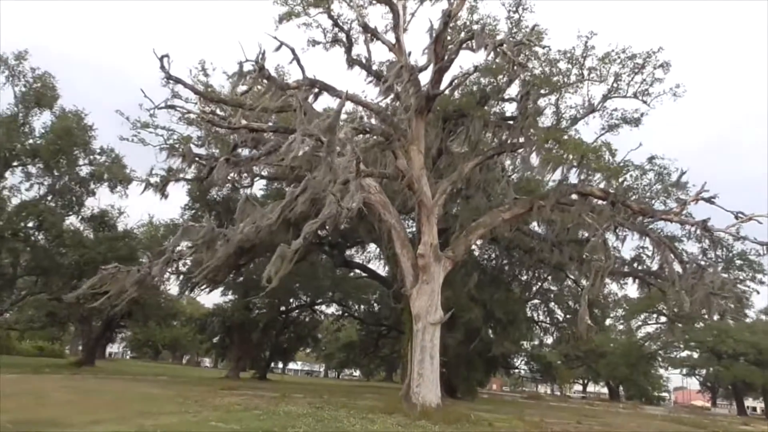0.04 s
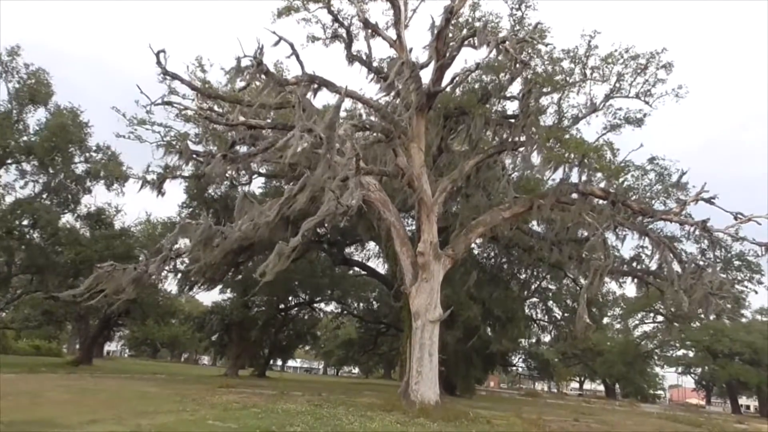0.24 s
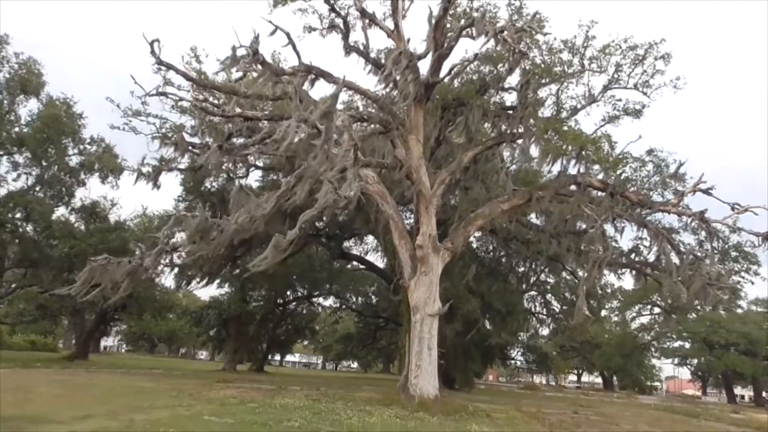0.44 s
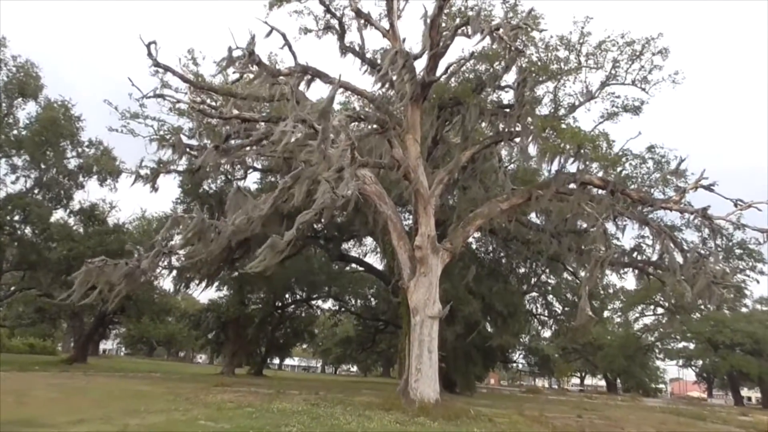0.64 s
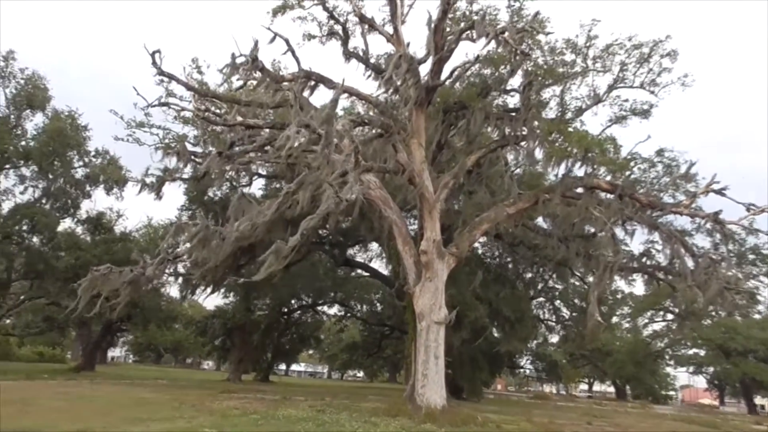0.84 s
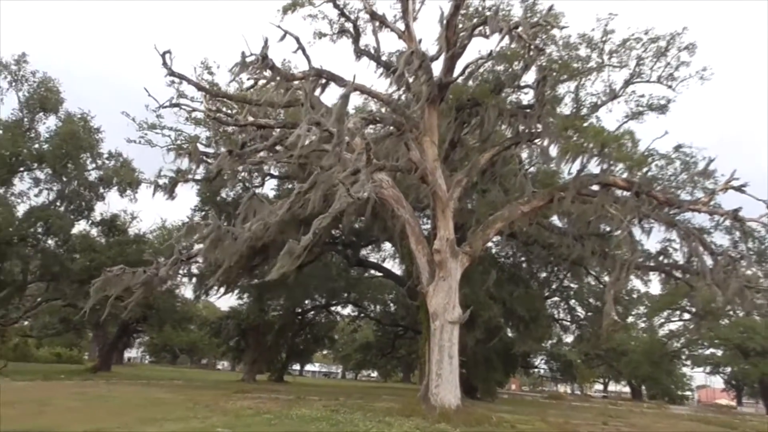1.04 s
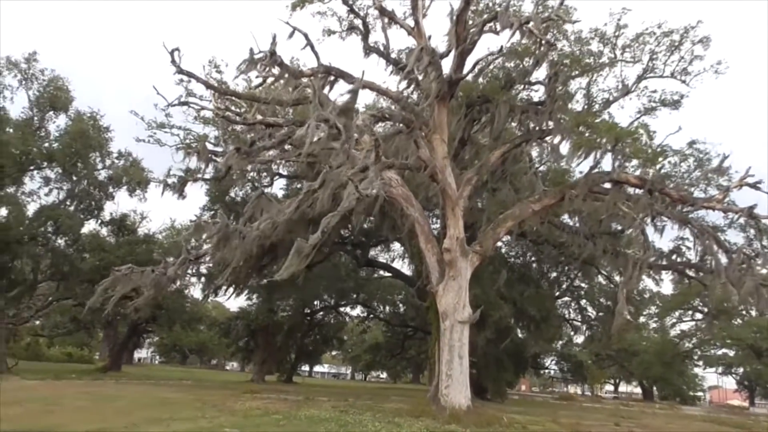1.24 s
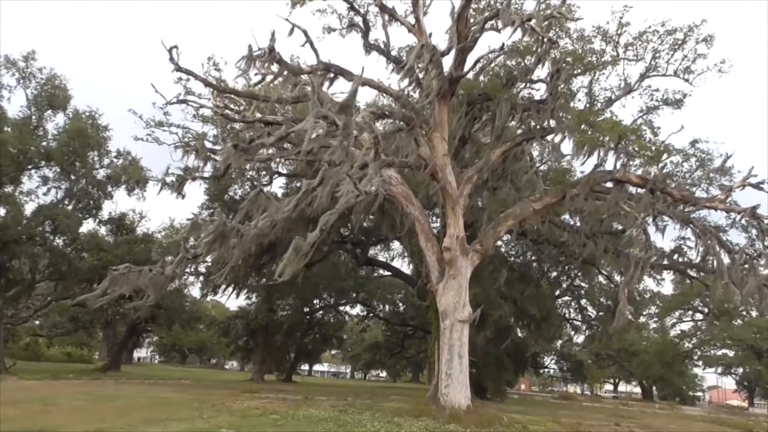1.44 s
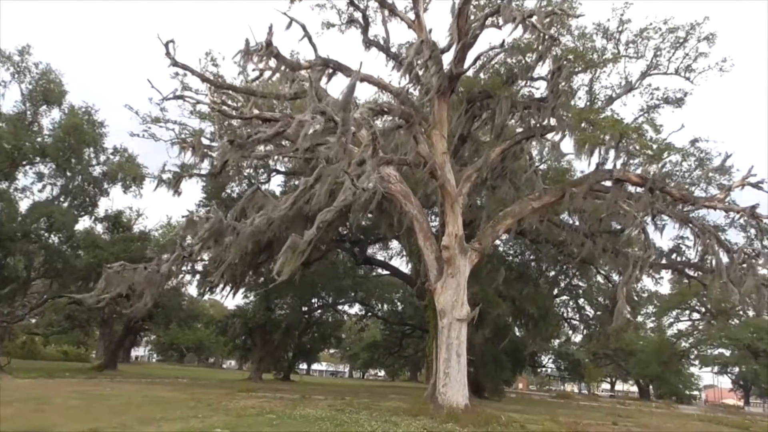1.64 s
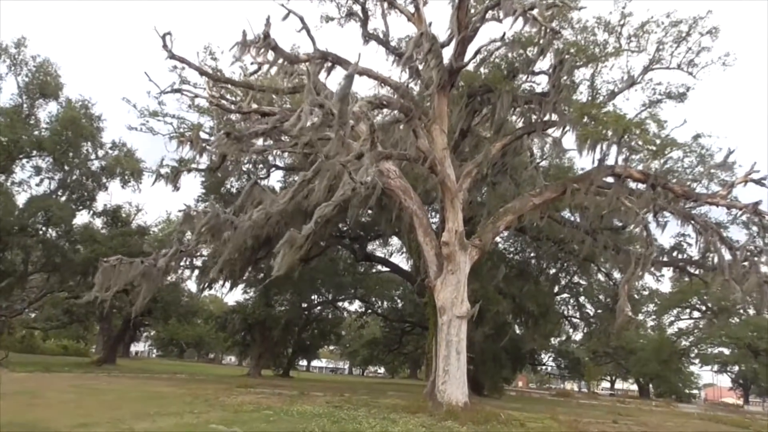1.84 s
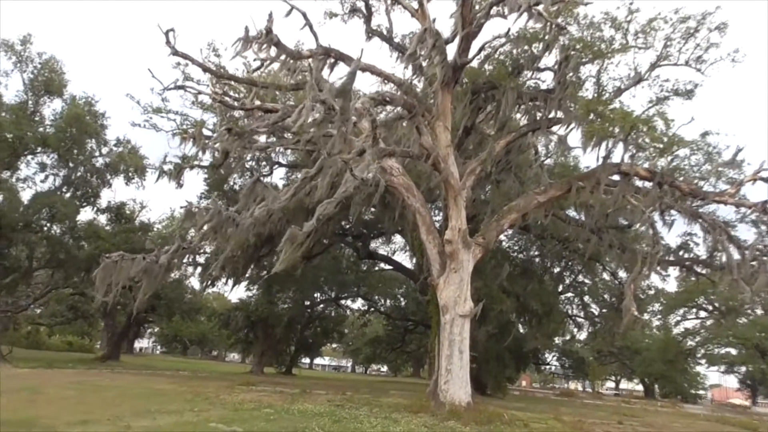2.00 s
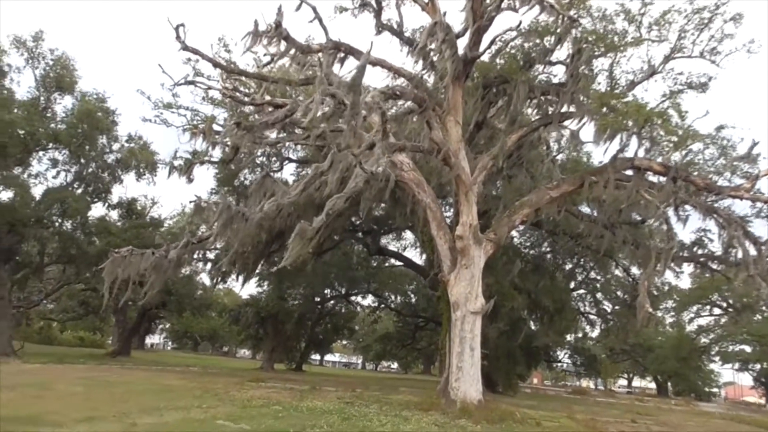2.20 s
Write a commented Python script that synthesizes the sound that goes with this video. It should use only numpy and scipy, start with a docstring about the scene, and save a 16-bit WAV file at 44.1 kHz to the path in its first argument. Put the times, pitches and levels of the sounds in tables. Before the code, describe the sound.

Wind buffets a hand-held microphone on a lawn: weak low rumble first, a heavy thumping gust around 0.5 s, another swell near 0.8 s, a lull about 1.1 s, then strong thuds at 1.4, 1.55 with a small pop, and 1.95 s. A wavering low tone swells near 1.85 s. Faint leaf hiss and distant wash continue; soft grass steps brush at 0.15, 0.75, 1.3 and 1.9 s, the last three with tiny snaps.

```python
"""A hand-held microphone is carried slowly across a lawn, gusts buffeting its two ports from the outset.
Eddy noise makes deep thuds and a lumpy rumble with flutter on top; far off lie a wash and a hiss of leaves.
Four soft steps of grainy grass noise pass close by, three of them with snapping stalks.
From about 0.5 s smooth pulses thump on the ports; past 1.5 s a filtered click pops.
A wavering tone swells around 1.85 s; by then the image has closed nearly to mono."""
import sys
import numpy as np
from scipy import signal
from scipy.fft import rfft, irfft
from scipy.io import wavfile
from scipy.ndimage import uniform_filter1d

SR = 44100
rng = np.random.default_rng(int(sys.argv[2]) if len(sys.argv) > 2 else 0)


def wav_record(signal):
    """Record a signal, one row per channel, as 16-bit PCM in the file named by sys.argv[1]."""
    frames = np.transpose(np.atleast_2d(signal))
    bounded = np.clip(frames, -1, 1)
    # unit amplitude maps onto the largest positive 16-bit level
    quanta = np.round(bounded * 32767).astype(np.int16)
    wavfile.write(sys.argv[1], SR, quanta)


N = 99886
TIME = np.arange(N) / SR


def from_db(db):
    """Decibels to gain."""
    return 10 ** (np.asarray(db) / 20)


def rms_one(x):
    """Scale to unit power."""
    return x / np.sqrt(np.mean(x ** 2))


def in_time(rows):
    """Join the (time, value) rows of a curve with straight lines."""
    seconds, values = np.transpose(rows)
    return np.interp(TIME, seconds, values)


def drift(rate_hz):
    """Slow chance with spread 1: white noise through a two-pole low-pass."""
    step = 40   # samples between the slow values
    pole = np.exp(-2 * np.pi * rate_hz * step / SR)
    white = rng.standard_normal(N // step + 2002)
    slow = signal.lfilter([1], [1, -2 * pole, pole ** 2], white)[2000:]   # drop the filter's start
    return np.interp(np.arange(N) / step, np.arange(len(slow)), rms_one(slow))


def octaves():
    """The place of each spectral line on an octave scale."""
    return np.log2(np.fft.rfftfreq(N, 1 / SR) + 1)


def coloured(spectrum):
    """Two unrelated noises with the given spectrum, falling 30 dB per octave beyond its ends."""
    hz, db = np.transpose(spectrum)
    octave, points = octaves(), np.log2(hz)
    beyond = np.abs(octave - np.clip(octave, points[0], points[-1]))
    gain = from_db(np.interp(octave, points, db) - 30 * beyond)
    white = rng.standard_normal((2, N))
    return rms_one(irfft(rfft(white) * gain, N))


def stereo(pair, likeness):
    """Mix two unrelated signals into left and right with the given correlation."""
    shared = np.sqrt(1 + likeness) * pair[0]
    opposed = np.sqrt(1 - likeness) * pair[1]
    return np.array([shared + opposed, shared - opposed]) / np.sqrt(2)


def swell(s, rise_s, fall_s):
    """An envelope that rises exponentially to 1 at s and dies away exponentially."""
    return np.exp(-np.maximum((s - TIME) / rise_s, (TIME - s) / fall_s))


EDDY_S, EDDY_EVENNESS = 0.0304, 0.74   # length of an eddy [s]; share of chance swings smoothed away


def eddies(spectrum):
    """Turbulent noise at each port, its chance swings partly evened out by the steady flow."""
    noise = coloured(spectrum)
    power = uniform_filter1d(noise ** 2, int(EDDY_S * SR), axis=1) + 1e-9
    return rms_one(noise / power ** (EDDY_EVENNESS / 2))


# deep thudding of the largest eddies: (frequency [Hz], relative density [dB per Hz])
DEEP_SPECTRUM = [(22, -34), (32, -31), (48, -14.5), (70, -8.5), (100, 1.5), (125, 3.5)]
# level of that deep bass at the microphone: (time [s], level [dB])
DEEP_LEVEL = [(0.0, -38), (0.23, -33.5), (0.29, -47), (0.31, -31.5), (0.52, -25), (0.55, -32.5),
              (0.8, -30.5), (0.84, -20.5), (0.9, -32.5), (1.0, -26), (1.03, -35.5), (1.33, -23.5),
              (1.35, -37), (1.38, -20.5), (1.68, -33), (1.72, -34), (1.888, -33), (1.93, -16),
              (1.99, -30.5), (2.26, -24.5)]


def buffeting():
    """Eddies press on each port as deep thuds."""
    return eddies(DEEP_SPECTRUM) * from_db(in_time(DEEP_LEVEL))


# low buffeting close on the ports: (frequency [Hz], relative density [dB per Hz])
RUMBLE_SPECTRUM = [(120, -6), (145, -3), (180, 2.5), (220, -0.5), (300, -5.5), (350, -10), (430, -14),
                   (560, -23.5)]
# wind pressure on the ports, before the rumble's trim: (time [s], level [dB])
GUST_LEVEL = [(0.0, -32.5), (0.11, -43), (0.14, -28.5), (0.29, -45.5), (0.33, -31), (0.37, -36),
              (0.45, -16.5), (0.51, -16), (0.58, -23), (0.64, -24.5), (0.7, -28.5), (0.82, -18.5),
              (0.91, -24.5), (1.01, -22), (1.08, -34), (1.18, -38.5), (1.21, -21), (1.23, -36.5),
              (1.3, -28), (1.4, -26), (1.43, -27.5), (1.51, -20.5), (1.52, -28.5), (1.55, -16.5),
              (1.67, -28.5), (1.7, -18), (1.84, -22), (1.93, -15.5), (1.97, -22), (2.05, -19.5),
              (2.085, -26), (2.13, -21), (2.16, -27.5), (2.2, -23.5), (2.26, -21)]
RUMBLE_TRIM_DB, PATCHY_DB = -0.5, 1.5   # trim; spread of the chance swings in level


def rumble(lumps):
    """Smaller eddies make a rumble whose level is lumpy by chance."""
    return eddies(RUMBLE_SPECTRUM) * from_db(RUMBLE_TRIM_DB + in_time(GUST_LEVEL) + PATCHY_DB * lumps)


# fine turbulence right at the ports: (frequency [Hz], relative density [dB per Hz])
FLUTTER_SPECTRUM = [(330, -2), (480, -0.5), (750, -5.5), (1000, -9.5), (1350, -13.5), (1700, -29),
                    (2300, -33), (3200, -59)]
# level of the fine turbulence, before its trim: (time [s], level [dB])
FLUTTER_LEVEL = [(0, -54), (0.382, -48.5), (.46, -40.5), (.52, -33.5), (.56, -44), (0.682, -43.5),
                 (.8, -35.5), (0.902, -37.5), (1.122, -57), (1.21, -43.5), (1.26, -51.5), (1.38, -43.5),
                 (1.49, -43), (1.55, -30.5), (1.58, -37), (1.66, -40), (1.84, -33.5), (1.93, -31.5),
                 (2.03, -37.5), (2.18, -44), (2.239, -35.5)]
FLUTTER_TRIM_DB, FLUTTER_ROUGH_DB = 0.5, 2.37   # trim; spread of the chance swings
FLUTTER_LIKENESS = .4   # correlation at the two ports


def flutter(lumps):
    """Fine turbulence is rough: it shares the rumble's lumps and adds quicker ones."""
    roughness = (lumps + drift(110)) / np.sqrt(2)
    level_db = FLUTTER_TRIM_DB + in_time(FLUTTER_LEVEL) + FLUTTER_ROUGH_DB * roughness
    return stereo(coloured(FLUTTER_SPECTRUM) * from_db(level_db), FLUTTER_LIKENESS)


# how alike the two ports of the microphone feel the eddies: (time [s], correlation [-1 to 1])
PORT_LIKENESS = [(0, -0.46), (.25, -0.68), (.42, 0.05), (.7, 0.39), (1.0, 0.47), (1.4, 0.028), (1.55, 0.45)]
# left-right lean of the wind noise, jittering by chance, mostly to the right:
# (time [s], left minus right level [dB])
WIND_LEAN = [(0.0, -1.5), (0.46, -3.5), (0.564, -12), (0.6, 1.5), (0.644, -16.5), (0.698, -1.5),
             (0.752, -11.5), (1.122, -11), (1.182, -2.5), (1.248, -14.5), (1.47, -4.5), (1.62, -8.5)]


def wind():
    """Wind noise on both ports leans left or right while its mid level follows the layers' own levels."""
    lumps = drift(59)
    likeness, lean_db = in_time(PORT_LIKENESS), in_time(WIND_LEAN)
    left, right = from_db(lean_db / 2), from_db(-lean_db / 2)
    # level of the average of two partly alike ports; left * right is 1
    centre = np.sqrt(left ** 2 + right ** 2 + 2 * likeness) / 2
    low = stereo(buffeting() + rumble(lumps), likeness) + thumps() + sinking_tone()
    high = flutter(lumps) * 2 / (left + right)
    return (low / centre + high) * np.array([left, right])


# distant sound arrives from all round: (frequency [Hz], left-right correlation [-1 to 1])
DIFFUSE_LIKENESS = [(300, 0.75), (1300, 0.81), (4000, 0.48), (6500, 0.34), (9000, -0.28), (12000, 0.31),
                    (15000, .1)]
# treble balance of the two ports: (frequency [Hz], left minus right level [dB])
PORT_BALANCE = [(5000, -1), (9000, 1), (12000, -3)]


def diffuse(spectrum):
    """Noise from all round: largely alike at both ports in the bass, much less so in the treble."""
    octave = octaves()
    hz, likeness = np.transpose(DIFFUSE_LIKENESS)
    likeness = np.interp(octave, np.log2(hz), likeness)
    hz, balance_db = np.transpose(PORT_BALANCE)
    balance_db = np.interp(octave, np.log2(hz), balance_db)
    ports = stereo(rfft(coloured(spectrum)), likeness)
    return irfft(ports * from_db([balance_db / 2, -balance_db / 2]), N)


# distant outdoor wash: (frequency [Hz], relative density [dB per Hz])
WASH_SPECTRUM = [(300, 0.5), (500, 7), (800, 3), (1300, -1.5), (1700, -10), (2100, -14.5), (2700, -32)]
# hiss of leaves: (frequency [Hz], relative density [dB per Hz])
LEAVES_SPECTRUM = [(2000, 1), (4600, -0.5), (6100, -5), (7400, 0), (9300, -1), (12000, -6), (14000, -12.5),
                   (15600, -16)]
# level of that hiss at the microphone: (time [s], level [dB])
LEAVES_LEVEL = [(0, -53.5), (.25, -56), (.5, -55), (.61, -60), (.75, -57), (1.45, -54.5), (1.58, -61),
                (1.9, -58.5), (2.26, -57.5)]
WASH_DB, WASH_FOLLOWS = -43.5, 0.68   # mean level; share of the hiss's swing in dB that it follows


def surroundings():
    """A far wash and the hiss of the trees, rising and sinking together."""
    leaves_db = in_time(LEAVES_LEVEL)
    wash_db = WASH_DB + WASH_FOLLOWS * (leaves_db - leaves_db.mean())
    wash = from_db(wash_db) * diffuse(WASH_SPECTRUM)
    leaves = from_db(leaves_db) * diffuse(LEAVES_SPECTRUM)
    return wash + leaves


# dry stalks snap underfoot: (time [s], envelope peak [dB], lowest frequency [Hz])
SNAPS = [(.743, -47, 7000), (.747, -44.5, 4000), (.7585, -44.5, 7500), (1.2738, -43, 5000),
         (1.2767, -36.5, 8200), (1.285, -49, 8000), (1.4097, -43, 5000), (1.897, -53, 3500)]
SNAP_RISE_S, SNAP_FALL_S, SNAP_TOP_HZ = 0.00033, 0.001, 11400


def snaps():
    """A stalk breaks with a very short puff of noise in one band, alike at both ports."""
    total = np.zeros(N)
    for s, db, low_hz in SNAPS:
        puff = coloured([(low_hz, 0), (SNAP_TOP_HZ, 0)])[0]
        total += from_db(db) * puff * swell(s, SNAP_RISE_S, SNAP_FALL_S)
    return total


# shoes brush through the grass, up to three times a step:
# (time [s], envelope peak [dB], rise and fade time [s])
BRUSHES = [(.148, -53.5, 0.053), (.76, -54.5, 0.07), (1.27, -54, 0.064), (1.358, -49.5, 0.036),
           (1.415, -52, 0.068), (1.88, -55, 0.065), (1.995, -58, 0.07)]
# swish of the blades: (frequency [Hz], relative density [dB per Hz])
GRASS_SPECTRUM = [(2500, -12), (4500, -1), (6300, -0.5), (7300, 1.5), (9200, 6), (10300, 0), (12500, 0),
                  (15500, -14)]
GRAIN_RATE_HZ, GRAIN_DB, STEP_LIKENESS = 180, 2.5, 0.35   # grain speed, spread; port correlation
SPLINTER_DB, SPLINTER_S = -14, 0.0099   # crackle after a snap: level against the snap, fade time


def footsteps():
    """Each step is a grainy swish of grass; stalks snap and their fibres crackle on briefly."""
    brushing = np.sqrt(sum((from_db(db) * swell(s, fade_s, fade_s)) ** 2 for s, db, fade_s in BRUSHES))
    splintering = sum(from_db(db + SPLINTER_DB) * swell(s, SNAP_FALL_S, SPLINTER_S) for s, db, _ in SNAPS)
    grains = from_db(GRAIN_DB * drift(GRAIN_RATE_HZ))
    swish = stereo(coloured(GRASS_SPECTRUM), STEP_LIKENESS)
    return swish * np.hypot(brushing, splintering) * grains + snaps()


# single large eddies thump on the ports, before the left-right lean: (time [s], peak level [dB])
THUMPS = [(0.4629, -11.5), (1.401, -14), (1.546, -11), (1.9447, -12)]
THUMP_HZ = 187   # strongest frequency of the pulse


def thumps():
    """A large eddy passes as one smooth push with a slight suction before and after it."""
    total = np.zeros(N)
    for s, db in THUMPS:
        u = (np.pi * THUMP_HZ * (TIME - s)) ** 2
        total += from_db(db) * (1 - 2 * u) * np.exp(-u)
    return total


# one sharp eddy pops on the ports: (time [s], peak level [dB])
POP = (1.5397, -28.5)
POP_TOP_HZ = 3300


def pop():
    """A single thin pressure tick, a low-passed impulse, hits both ports at once."""
    s, db = POP
    impulse = (np.arange(N) == int(s * SR)).astype(float)
    low_pass = signal.butter(8, POP_TOP_HZ, fs=SR, output="sos")
    tick = signal.sosfilt(low_pass, impulse)
    return from_db(db) * tick / np.abs(tick).max()


# a low tone between two gust peaks, before the left-right lean:
# (time [s], level [dB], rise and fade time [s])
TONE = (1.85, -22, .11)
TONE_HZ, TONE_SAG_OCTAVES_PER_S, TONE_WAVER = 180, 1.7, .09   # pitch at the peak; sag; relative waver


def sinking_tone():
    """Between two gust peaks a low sine swells and fades, wavering by chance and sinking in pitch."""
    s, db, fade_s = TONE
    sag = 2 ** (-TONE_SAG_OCTAVES_PER_S * (TIME - s))
    hz = TONE_HZ * sag * (1 + TONE_WAVER * drift(30.3))
    wave = np.sqrt(2) * np.sin(2 * np.pi * np.cumsum(hz) / SR)
    envelope = np.exp(-((TIME - s) / fade_s) ** 2)
    return from_db(db + PATCHY_DB * drift(30)) * wave * envelope


# width of the stereo image: (time [s], share of the side signal [0 to 1])
WIDTH = [(1.2, 0.96), (1.58, 0.34), (1.7, 0.31), (1.76, 0.033)]


def narrowed(x):
    """The image closes towards mono as the left-right difference is turned down."""
    mid = (x[0] + x[1]) / 2
    side = (x[0] - x[1]) / 2 * in_time(WIDTH)
    return np.array([mid + side, mid - side])


def scene():
    """Wind on the ports over the quiet lawn."""
    return wind() + surroundings() + footsteps() + pop()


CUTOFF_HZ = 15700


def record(dry):
    """The image narrows, and an elliptic low-pass cuts the top steeply."""
    low_pass = signal.ellip(12, .1, 80, CUTOFF_HZ, fs=SR, output="sos")   # ripple, stop-band depth [dB]
    return signal.sosfilt(low_pass, narrowed(dry))


dry = scene()
out = record(dry)
wav_record(out)
```